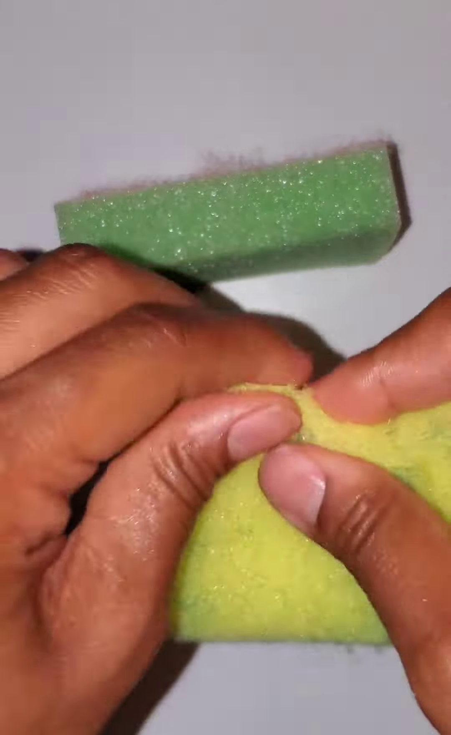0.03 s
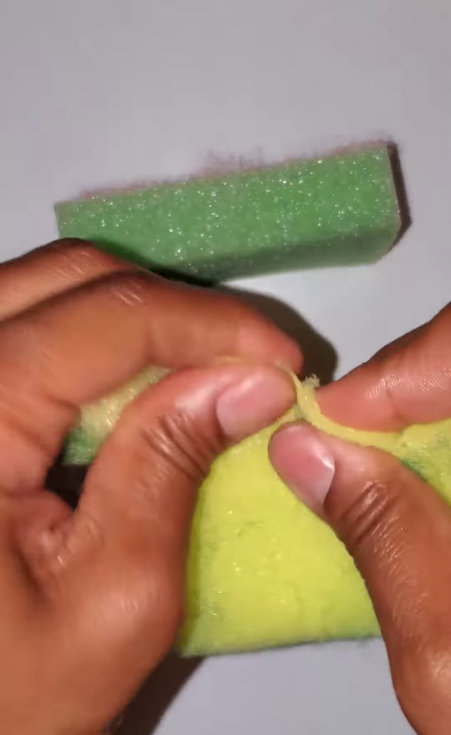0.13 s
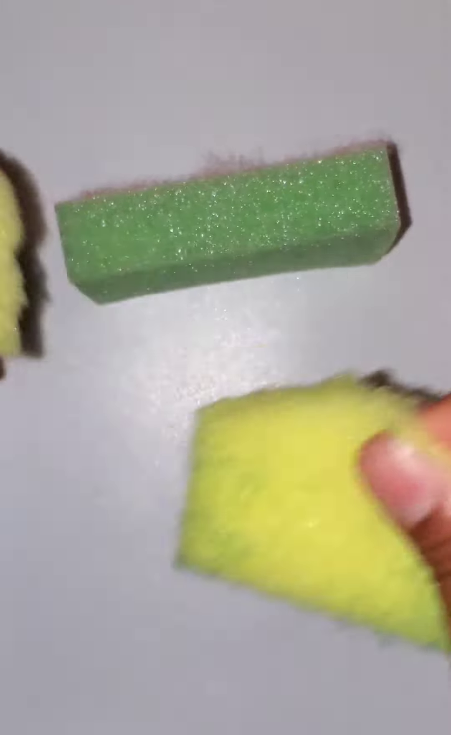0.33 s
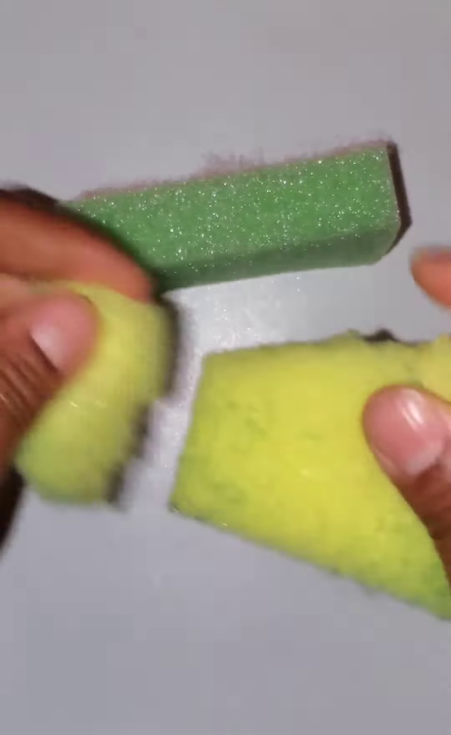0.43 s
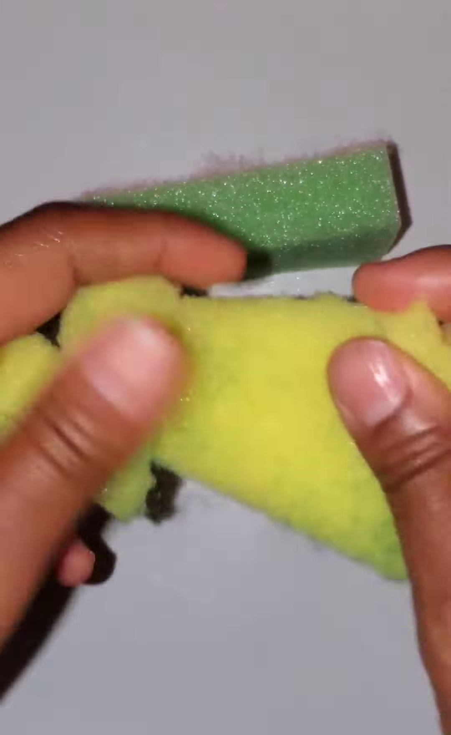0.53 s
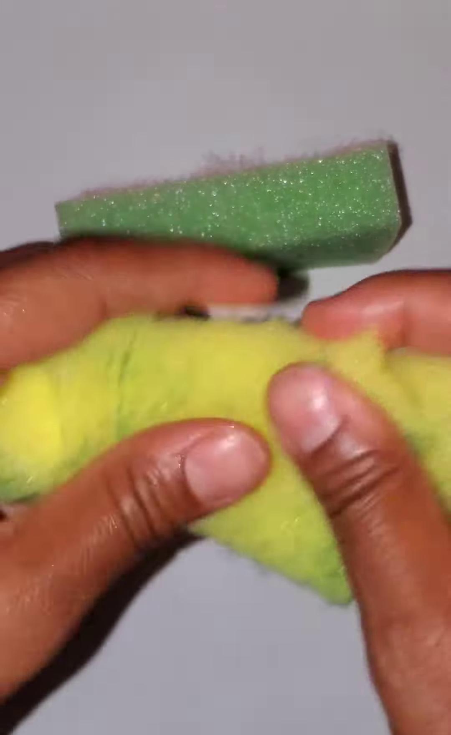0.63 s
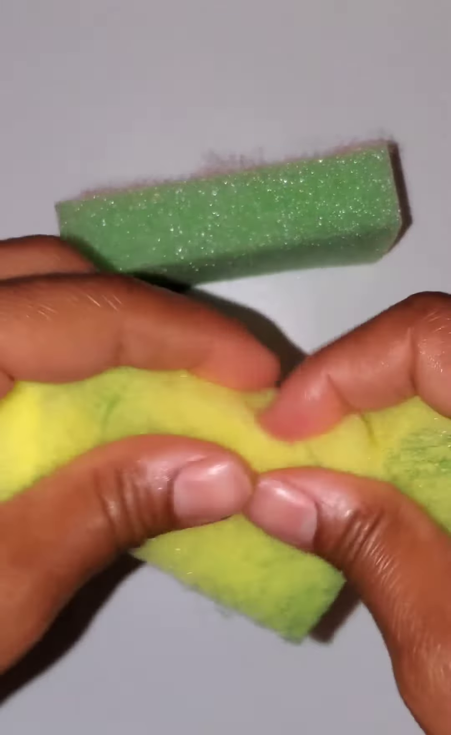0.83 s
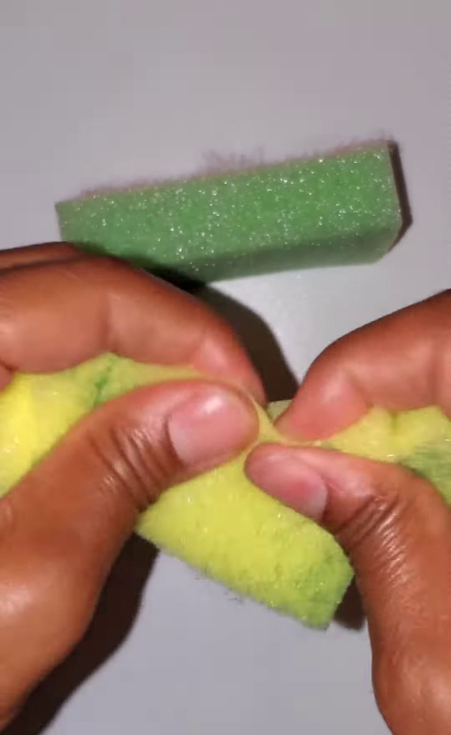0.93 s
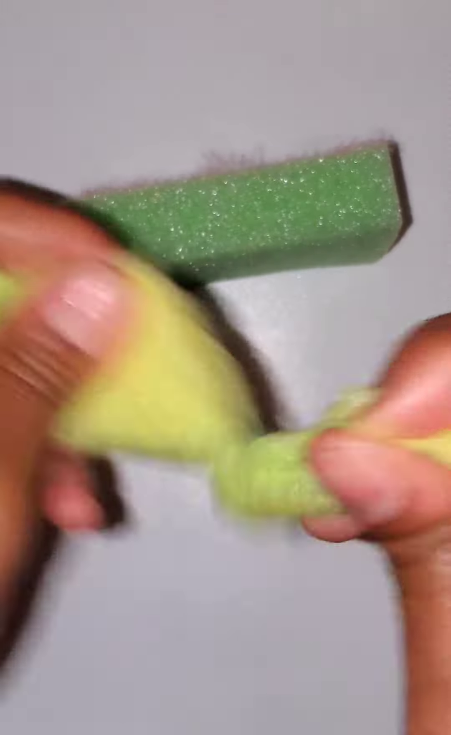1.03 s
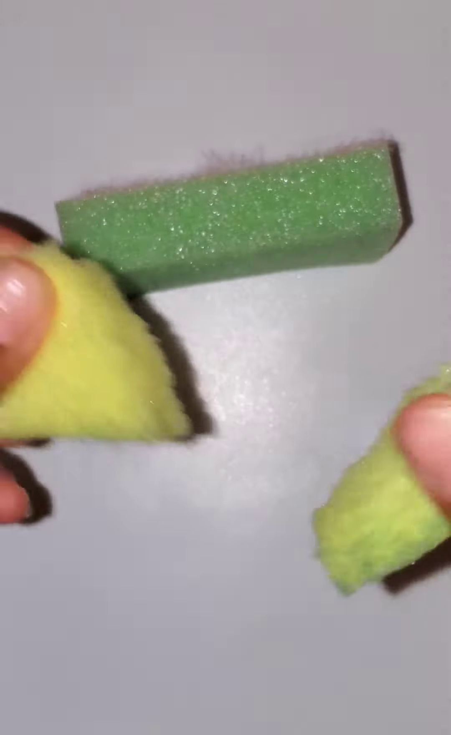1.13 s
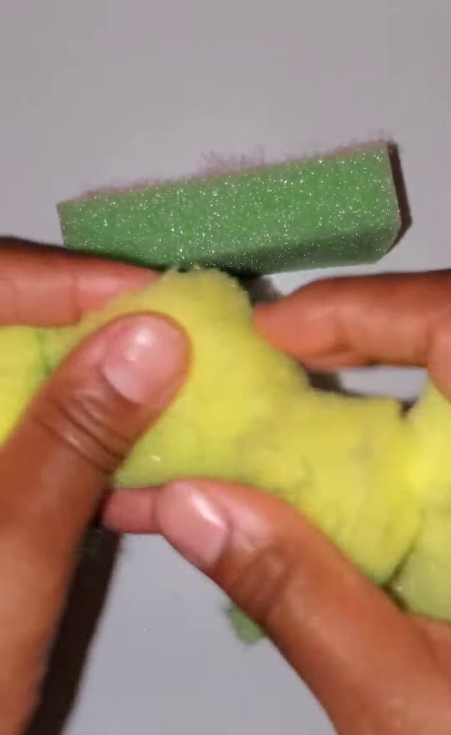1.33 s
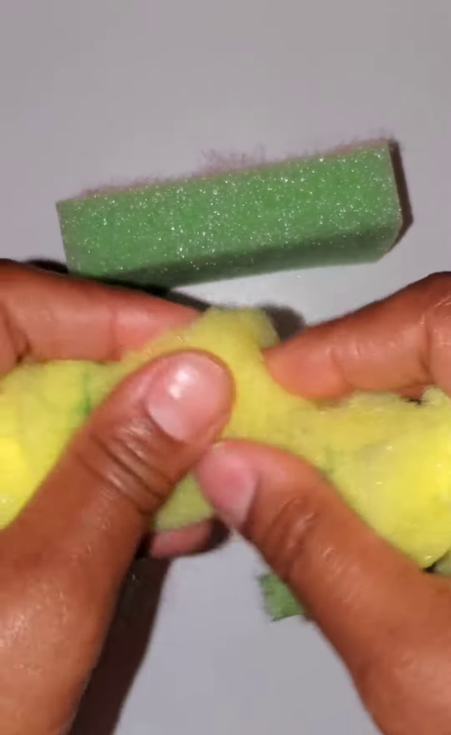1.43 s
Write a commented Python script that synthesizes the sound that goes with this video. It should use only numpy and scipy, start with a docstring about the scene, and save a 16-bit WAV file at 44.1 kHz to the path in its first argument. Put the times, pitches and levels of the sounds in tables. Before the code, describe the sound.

Two short, fizzy rips of a soft sponge being torn by hand, up close.

```python
"""A soft foam sponge is ripped twice by two hands, close to the microphone in a small room.
Each rip is a rush of snapping cell walls; as the gap opens, its hollow sound reaches lower and lower.
Fingers rub the foam, single strands tick, loose chunks flap and push air at the microphone,
and the hands spring back with a thump. The room hums faintly."""
import sys
import numpy as np
from scipy import signal
from scipy.io import wavfile

SR = 44100
rng = np.random.default_rng(int(sys.argv[2]) if len(sys.argv) > 2 else 0)


def wav_out(sig):
    """Save sig, one row per channel (or a flat mono array), as 16-bit PCM at SR to the path in sys.argv[1]."""
    wavfile.write(sys.argv[1], SR, np.round(np.clip(np.atleast_2d(sig).T, -1, 1) * 32767).astype(np.int16))


N = 66150
TIME = np.arange(N) / SR
SIDES = np.array([[1], [-1]])   # plus for the left channel, minus for the right


def from_db(db):
    """Turn decibels into a factor to multiply a sound by."""
    return 10 ** (np.asarray(db) / 20)


def rms_one(x):
    """Scale a signal so that its average strength (rms) is 1."""
    return x / np.sqrt(np.mean(x ** 2) + 1e-20)


def at_hz(points, hz, column=1):
    """Read a table between its rows, on a scale where all octaves are equally wide."""
    table = np.array(points)
    return np.interp(np.log(hz), np.log(table[:, 0]), table[:, column])


def bands():
    """List the middle frequency and the filter of each band, from bass to treble."""
    edges_hz = np.concatenate([np.geomspace(28, 280, 9)[:-1], np.geomspace(280, 16500, 25)])
    return [(np.sqrt(low * high), signal.butter(2, [low, high], "band", fs=SR, output="sos"))
            for low, high in zip(edges_hz, edges_hz[1:])]


def hiss():
    """Two pairs of unrelated white noises; neighbouring bands use different pairs."""
    return rng.standard_normal((2, 2, N))


def snaps(per_s, spread_db):
    """Tiny clicks of uneven size at random moments."""
    happens = rng.random(N) < per_s / SR
    sizes = from_db(spread_db * np.minimum(rng.exponential(1, N), 5))
    return hiss() * happens * sizes + 1e-18


def coloured(source, spectrum, shape=lambda hz: 1, lean=1):
    """Give noise a tone colour and a stereo spread at rms 1, then shape each band over time."""
    # how alike left and right are: f/Hz, likeness (1 = the same)
    likeness = [(60, 0.7), (300, 0.78), (700, 0.42), (1400, 0.5), (2700, 0.4), (4600, -0.28), (8000, -0.06),
                (15000, -0.17)]
    # how much louder the left is, scaled by lean: f/Hz, level/dB
    balance = [(60, -1.5), (300, -5), (650, 4), (1400, 4.5), (2800, 1.5), (5200, -2), (8000, -5.5),
               (10500, -2.5), (13000, -13), (16000, -21.5)]
    steady, shaped = 0, 0
    for k, (hz, sos) in enumerate(bands()):
        mid, side = signal.sosfilt(sos, source[k % 2])
        alike = np.clip(at_hz(likeness, hz), -1, 1)
        stereo = np.sqrt(1 + alike) * mid + np.sqrt(1 - alike) * side * SIDES
        pan = rms_one(from_db(SIDES * lean * at_hz(balance, hz) / 2))
        band = from_db(at_hz(spectrum, hz)) * pan * stereo
        steady += band
        shaped += band * shape(hz)
    return shaped / np.sqrt(np.mean(steady ** 2))


def strikes(rows, decay_s):
    """Loudness over time of events that start suddenly and die away."""
    return sum(from_db(db) * (TIME >= s) * np.exp(-np.abs(TIME - s) / decay_s) for s, db in rows)


def swells(rows):
    """Loudness over time of events that rise and fall smoothly."""
    bells = [from_db(db) * np.exp(-.5 * ((TIME - s) / width) ** 2) for s, width, db in rows]
    return np.sqrt(sum(bell ** 2 for bell in bells) + 1e-20)


def follow(curve, boost_db, fade_db_per_s=2393):
    """Loudness over time that follows a curve and fades quickly beyond its ends."""
    times, db = np.transpose(curve)
    outside_s = np.abs(TIME - np.clip(TIME, times[0], times[-1]))
    return from_db(np.interp(TIME, times, db) + boost_db - fade_db_per_s * outside_s)


def background():
    """The room hisses faintly and has two low, wavering hums."""
    # tone colour of the hiss: f/Hz, relative level/dB
    spectrum = [(30, -13), (70, -9), (130, -10), (250, -11), (450, -20.5), (750, -22), (2000, -17),
                (5000, -13.5), (10000, -22.5), (16000, -14)]
    # room resonances: f/Hz, filter width/Hz, level/dB
    hums = [(66.7, 51, -74), (371.5, 47, -75.5)]
    sound = from_db(-62) * coloured(hiss(), spectrum, lean=0.83)
    for hz, width, db in hums:
        b, a = signal.iirpeak(hz, hz / width, fs=SR)
        narrow_noise = signal.lfilter(b, a, rng.standard_normal(N))
        sound += from_db(db) * rms_one(signal.lfilter(b, a, narrow_noise))
    return sound


def rubs():
    """Skin drags over the foam's open cells in soft, grainy strokes."""
    # finger strokes: middle t/s, half width/s, level/dB
    strokes = [(0.11, 0.06, -62), (0.316, 0.013, -36.5), (0.35, 0.021, -45.5), (0.52, 0.029, -58.5),
               (0.765, 0.037, -48.5), (0.845, 0.028, -57), (0.955, 0.026, -61.5), (1.122, 0.028, -42.5),
               (1.19, 0.027, -50.5), (1.32, 0.052, -54), (1.46, 0.058, -55.5)]
    # tone colour: f/Hz, relative level/dB
    spectrum = [(150, -20), (400, 0.5), (650, -4), (1100, -5.5), (1800, -2), (2600, 2.5), (4300, -2),
                (6000, -2), (9500, -12.5), (14000, -6.5), (16000, -15.5)]
    grains = coloured(snaps(per_s=10000, spread_db=3.5), spectrum)
    return grains * swells(strokes) * from_db(SIDES * 0.76)   # a little to the left


def ticks():
    """Single strands snap under the strain, each with a bright tick."""
    # breaking strands: t/s, level/dB
    breaks = [(0.074, -50.5), (0.1625, -53), (0.173, -51), (0.196, -40), (0.2289, -22.5), (0.2686, -14.5),
              (0.2845, -18), (0.2985, -29)]
    # tone colour: f/Hz, relative level/dB
    spectrum = [(1500, -35), (3500, -28), (6000, -12), (9000, -5), (12000, -11), (15000, 0.5)]
    return coloured(hiss(), spectrum) * strikes(breaks, decay_s=0.0035)


def opening_gap(start_s, opening_s):
    """The gap passes sound above its resonance, which falls as it widens. Returns a gain per band."""
    slit_hz, open_hz = 1990, 306
    sharpness, leak_db = 1.134, -23   # a little sound leaks through below the resonance
    gap_hz = np.interp(TIME, [start_s, start_s + opening_s], [slit_hz, open_hz])

    def gain(hz):
        ratio = hz / gap_hz
        resonance = (1 - ratio ** 2) ** 2 + (ratio / sharpness) ** 2
        high_pass = ratio ** 4 / np.sqrt(resonance * (1 + ratio ** 4))
        return from_db(leak_db) + high_pass
    return gain


def rips():
    """Cell walls snap in a dense rush: a high fizz and a hollow sound, both shaped by the gap."""
    # one gap per rip: start t/s, time to open/s, fizz boost/dB, hollow boost/dB
    gaps = [(0.228, 0.036, 1.63, 0.9), (1.008, 0.057, 3.8, 1.3)]
    # loudness before the boost, one curve per rip: t/s, level/dB
    fizz_curves = [
        [(0.214, -49.5), (0.232, -36.5), (0.242, -32.5), (0.264, -19.5), (0.302, -18), (0.314, -46.5)],
        [(0.984, -72), (0.998, -44), (1.066, -23), (1.082, -21), (1.092, -48)],
    ]
    hollow_curves = [
        [(0.22, -84), (0.228, -36.5), (0.268, -24), (0.28, -31.5), (0.304, -28.5), (0.312, -38.5)],
        [(0.992, -63), (1.0, -46), (1.048, -21), (1.072, -27.5), (1.086, -31), (1.094, -43.5)],
    ]
    # tone colours: f/Hz, relative level/dB
    fizz_spectrum = [(1500, -19.5), (3000, -4.5), (4200, -4.5), (5600, -1.5), (7200, 1.5), (9000, -7),
                     (11000, -2.5), (13500, 2), (16000, 1.5)]
    hollow_spectrum = [(200, -19), (320, 3), (600, -0.5), (1000, -4.5), (1600, 0.5), (2800, 0), (4000, -4),
                       (7000, -10.5), (16000, -52)]
    snaps_per_s, spread_db = 20000, 2
    sound = 0
    for k, (start_s, opening_s, fizz_db, hollow_db) in enumerate(gaps):
        gap = opening_gap(start_s, opening_s)
        fizz = coloured(snaps(snaps_per_s, spread_db), fizz_spectrum, gap)
        hollow = coloured(snaps(snaps_per_s, spread_db), hollow_spectrum, gap)
        sound += fizz * follow(fizz_curves[k], fizz_db) + hollow * follow(hollow_curves[k], hollow_db)
    return sound


def flaps():
    """Chunks of foam give way or spring back against the fingers with a dull pat."""
    # pats of foam: t/s, level/dB
    pats = [(0.2686, -19.5), (0.3012, -22.5), (0.3352, -27.5), (0.352, -38.5), (0.837, -53), (1.046, -20.5),
            (1.055, -22.5), (1.0842, -22)]
    # tone colour: f/Hz, relative level/dB
    spectrum = [(100, -16), (400, -1), (900, -3), (1500, -1.5), (3000, -2.5), (6000, -15), (16000, -31)]
    return coloured(hiss(), spectrum) * strikes(pats, decay_s=0.0026)


def puffs():
    """Moving hands and foam push air at the microphone, making brief rumbles."""
    # pushes of air: middle t/s, half width/s, level/dB
    pushes = [(0.314, 0.015, -44), (0.338, 0.0097, -62), (0.535, 0.0126, -69), (1.105, 0.016, -61),
              (1.22, 0.071, -65)]
    # tone colour: f/Hz, relative level/dB
    spectrum = [(30, -20), (55, -6.5), (90, -2.5), (145, -8), (250, -17), (600, -57)]
    return coloured(hiss(), spectrum) * swells(pushes)


def thumps():
    """The hands spring back as the foam parts and give a low, short thump."""
    # jolts of the hands: t/s, level/dB
    jolts = [(0.3102, -37.5), (1.087, -68)]
    pitch_hz, decay_s = 87, 0.12 / np.log(1000)   # fades by 60 dB in 0.12 s
    ring = sum(strikes([(s, db)], decay_s) * np.sin(2 * np.pi * pitch_hz * (TIME - s)) for s, db in jolts)
    return ring * from_db(SIDES * -2.5)   # toward the right


def room_echo(sound):
    """The room answers with a smooth tail of echoes, different on each side."""
    # echo tail: f/Hz, level/dB, time to fade by 60 dB/s
    echoes = [(100, -13.5, 0.35), (354, -13.5, 0.52), (900, -17.5, 0.56), (2480, -21, 0.7),
              (5400, -16, 0.5), (10100, -21.5, 0.46), (15100, -19, 0.24)]
    delay_s, crossfeed, left_db = 0.0033, 0.2, 1.4
    noise, tail = hiss(), 0
    for k, (hz, sos) in enumerate(bands()):
        decay = np.exp(-np.log(1000) * TIME / at_hz(echoes, hz, column=2)) * (TIME > delay_s)
        band = signal.sosfilt(sos, noise[k % 2] * decay) / np.sqrt(np.sum(decay ** 2))
        tail += from_db(at_hz(echoes, hz)) * band
    blended = sound + crossfeed * sound[::-1]   # each side gets a little of the other
    return signal.fftconvolve(blended, tail, axes=1)[:, :N] * from_db(SIDES * left_db)


def scene():
    """Add up all the sounds; only those of the sponge echo in the room."""
    sponge = rips() + ticks() + flaps() + rubs()
    return sponge + room_echo(sponge) + thumps() + puffs() + background()


def record(dry):
    """Cut away the very highest treble with a steep filter."""
    cutoff_hz = 15900
    return signal.sosfilt(signal.ellip(12, 0.1, 80, cutoff_hz, fs=SR, output="sos"), dry)


dry = scene()
out = record(dry)
wav_out(out)
```